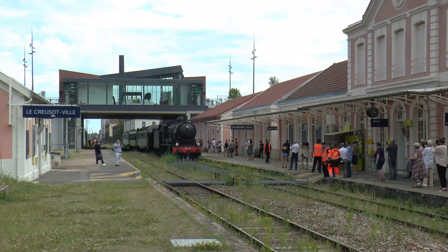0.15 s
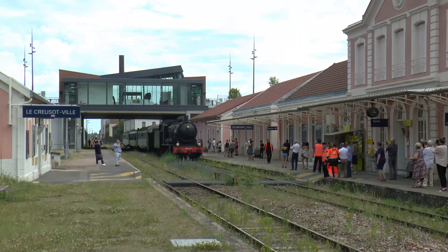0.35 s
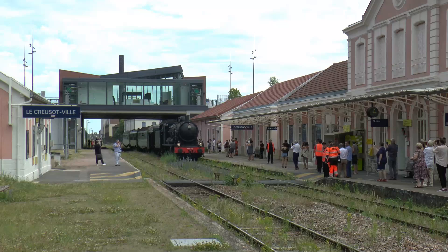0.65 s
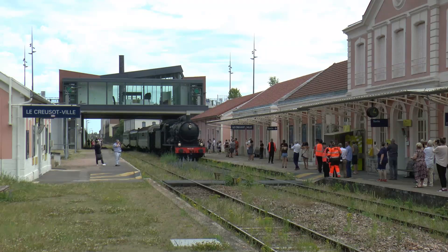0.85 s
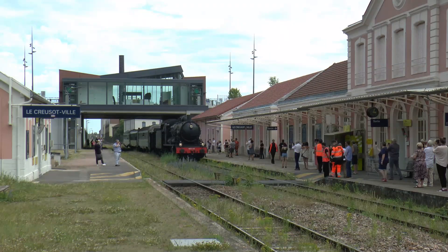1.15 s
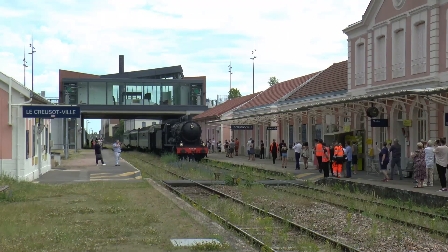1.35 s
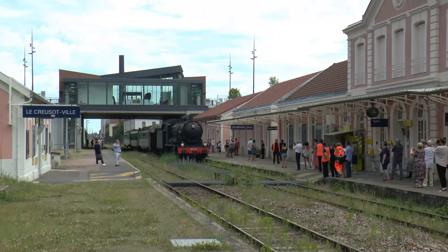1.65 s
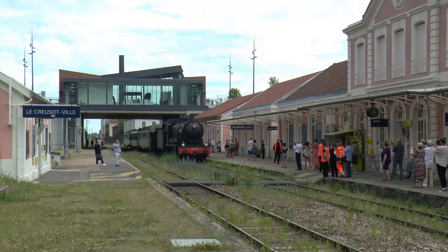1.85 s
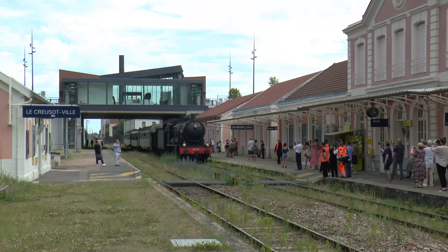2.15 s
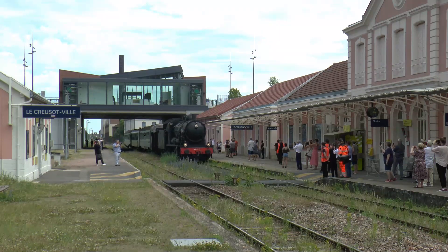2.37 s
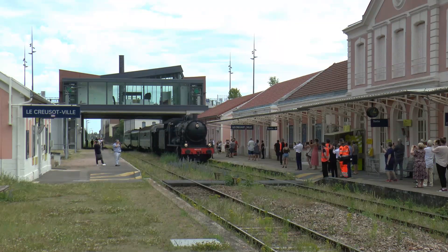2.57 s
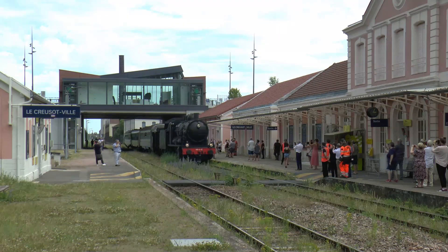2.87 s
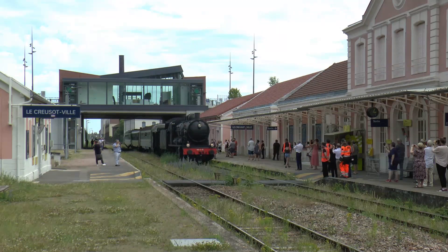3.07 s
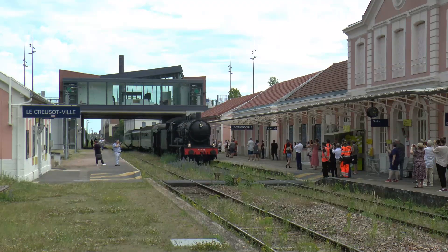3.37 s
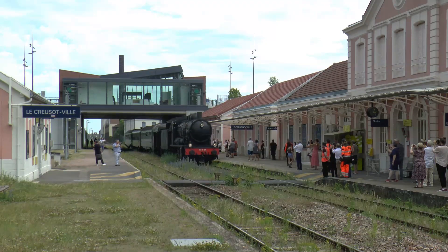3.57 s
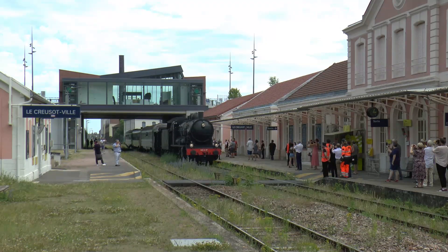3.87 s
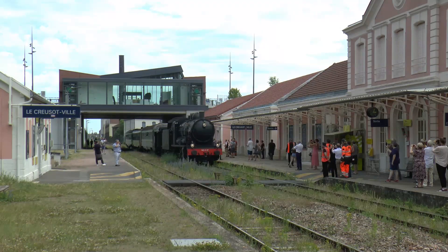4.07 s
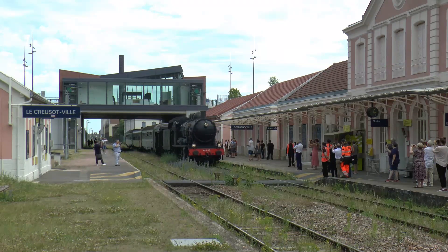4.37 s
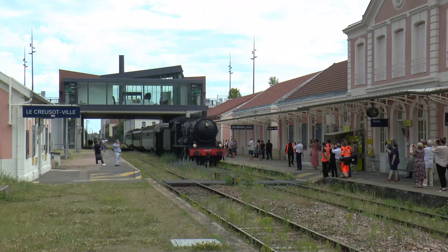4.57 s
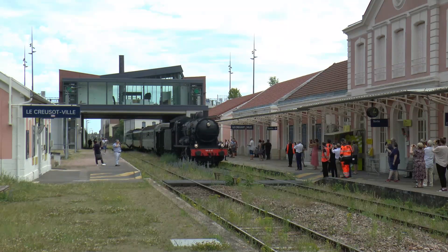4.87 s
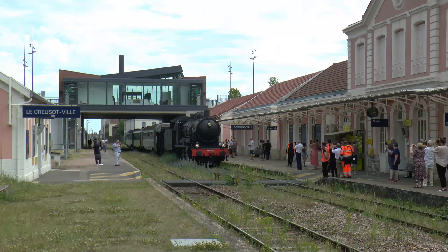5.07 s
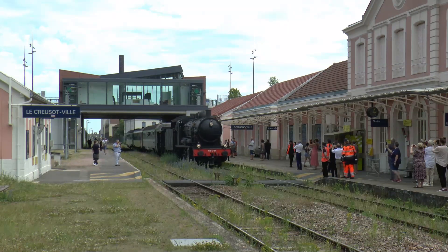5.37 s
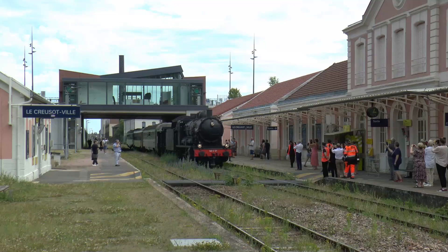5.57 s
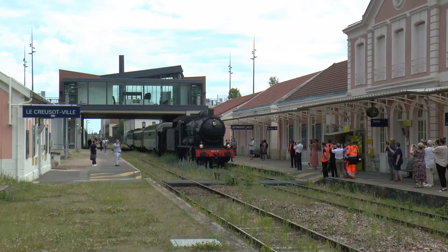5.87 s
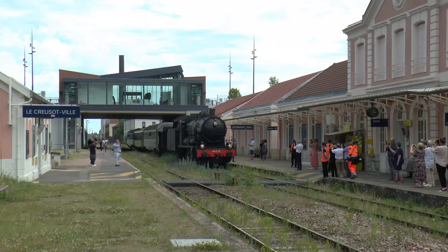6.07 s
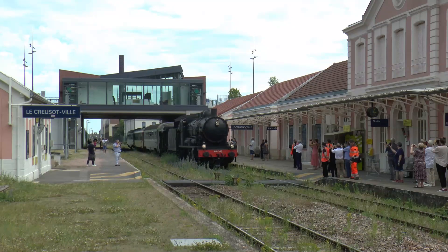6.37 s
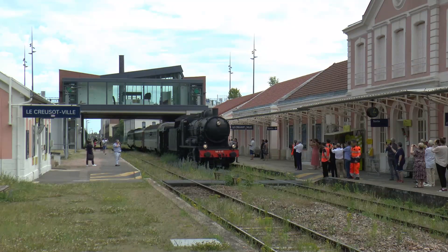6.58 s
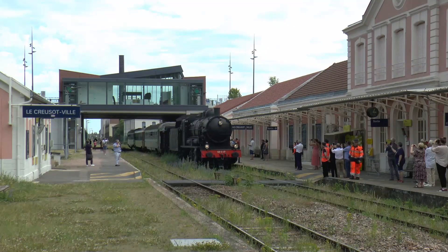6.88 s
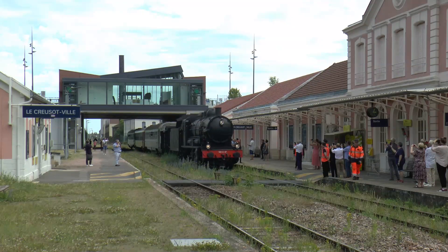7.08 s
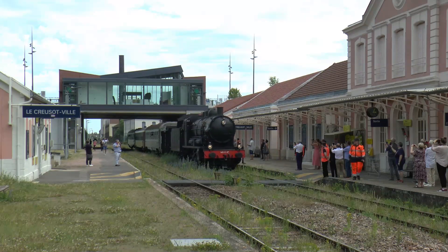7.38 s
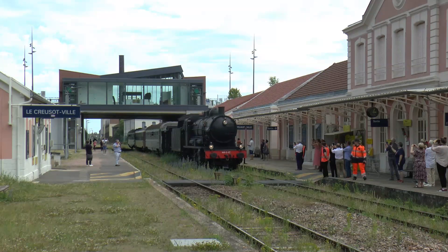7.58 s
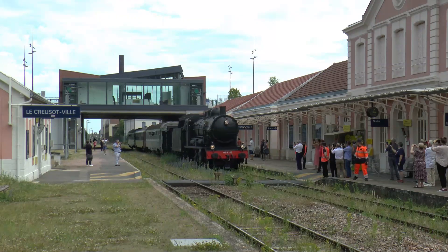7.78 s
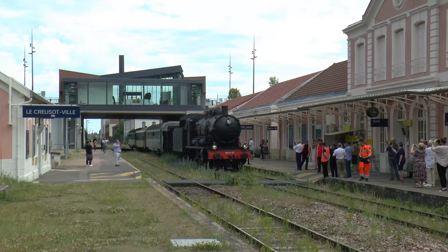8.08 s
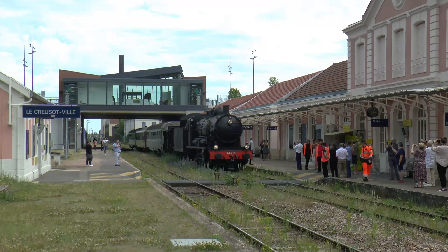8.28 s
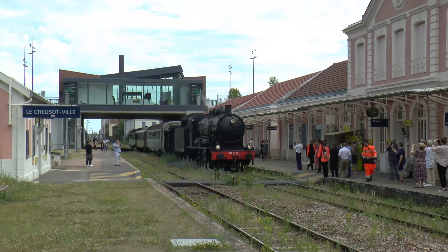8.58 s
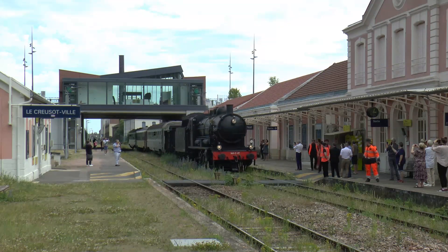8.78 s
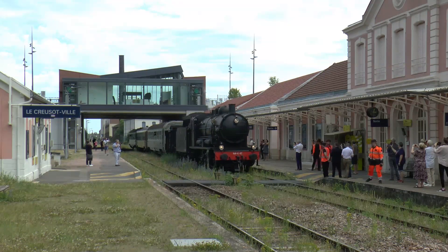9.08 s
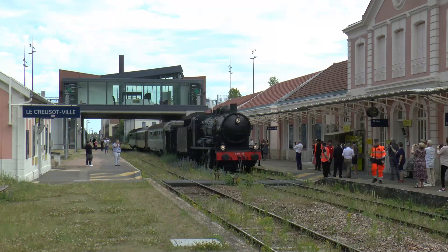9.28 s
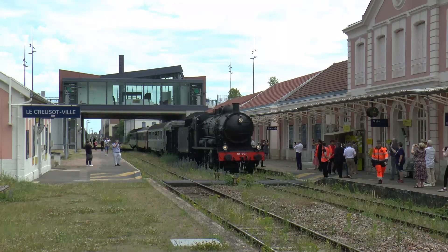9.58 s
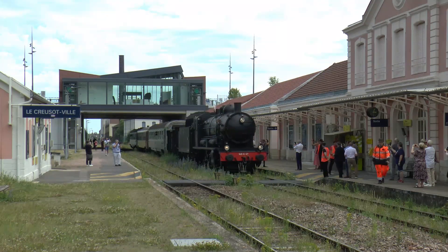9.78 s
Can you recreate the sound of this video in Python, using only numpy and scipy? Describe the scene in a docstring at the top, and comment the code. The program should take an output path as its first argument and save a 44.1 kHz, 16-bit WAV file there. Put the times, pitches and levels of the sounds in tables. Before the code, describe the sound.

A steam locomotive rolls slowly into a station, heard in stereo from some way off. Steam hisses throughout and grows louder over a low rumble of wheels and fire, with faint paired thumps from the air pump. A short, high whistle toot echoes off the buildings. Later comes a nearer, long, hoarse blast that climbs in steps, broken by brief rasps.

```python
"""A railway station, heard through a stereo microphone as a steam engine rolls slowly in, some way off.
Wheels and fire rumble, steam hisses all along, the air pump thumps in pairs, a faint tone sings at times.
A steam jet drives the whistle's bell: a short toot, later a nearer, long blast that rises as the valve
opens by steps, hoarse and with brief rasping bursts. Walls and roofs along the platforms send it back."""
import sys
import numpy as np
from scipy import signal
from scipy.fft import rfft, irfft, next_fast_len
from scipy.io import wavfile
from scipy.ndimage import uniform_filter1d, map_coordinates

SR = 44100
rng = np.random.default_rng(int(sys.argv[2]) if len(sys.argv) > 2 else 0)


def log_audio(samples):
    """Write samples as a 16-bit WAV file to the path given in sys.argv[1]."""
    # one column per channel
    frames = np.atleast_2d(samples).T
    # limit to full scale, then quantise
    limited = np.clip(frames, -1, 1)
    pcm = np.round(limited * 32767).astype(np.int16)
    wavfile.write(sys.argv[1], SR, pcm)


N = 438354

# the whistle valve during the short toot: (time [s], pitch [Hz], level of the fundamental [dB])
TOOT_VALVE = [(2.072, 1040, -42), (2.088, 1130, -22), (2.11, 1228, -19), (2.135, 1291, -13.5),
              (2.265, 1292, -12), (2.282, 1272, -20), (2.302, 1170, -20.5), (2.335, 1085, -26.5)]


def amp(db):
    """Decibels to gain."""
    return 10 ** (np.asarray(db) / 20)


def unit(x):
    """x at rms 1."""
    return x / np.sqrt(np.mean(x ** 2) + 1e-20)


def along(points, hz):
    """(frequency, value) points read at hz on a log axis."""
    f, values = np.transpose(points)
    return np.interp(np.log(hz + 1), np.log(f + 1), values)


def curves(rows):
    """One value per sample for each column after the time."""
    times, *columns = np.transpose(rows)
    return [np.interp(np.arange(N) / SR, times, column) for column in columns]


def wobble(rate, count=N):
    """A smooth random curve with `rate` knots a second."""
    fine = np.arange(0, count * rate / SR + 1, 1 / 16)
    smooth = map_coordinates(rng.standard_normal(int(count * rate / SR) + 4), [fine])
    return np.interp(np.arange(count) * rate / SR, fine, smooth)


def bumps(times, heights, widths):
    """The sum of bell-shaped bumps in time, one per event."""
    t = np.arange(0, N / SR + .001, .001)
    total = heights @ np.exp(-((t - times[:, None]) / np.reshape(widths, (-1, 1))) ** 2)
    return np.interp(np.arange(N) / SR, t, total)


def filtered(x, response):
    """x through a complex response of frequency."""
    size = next_fast_len(N + SR // 5, real=True)
    return irfft(rfft(x, size) * response(np.fft.rfftfreq(size, 1 / SR)), size)[..., :N]


def resonance(f, hz, width):
    """One causal resonance of peak gain 1."""
    return 1j * f * width / (hz * hz - f * f + 1j * f * width)


def noise(spectrum):
    """Mono noise of rms 1."""
    return unit(filtered(rng.standard_normal(N), lambda hz: amp(along(spectrum, hz))))


def rush(spectrum, patchy_db):
    """Stereo noise of rms 1 with patches of random gain in time and frequency."""
    # how alike left and right sound, centred in the mids, wider in lows and highs:
    # (frequency [Hz], correlation [0-1])
    likeness = [(30, 0.93), (80, 0.94), (250, .99), (1000, .999), (2500, 1), (5000, 0.97), (9000, 0.84),
                (14000, .78)]
    cells = signal.stft(rng.standard_normal((2, N)), nperseg=512)[2]
    patches = uniform_filter1d(rng.standard_normal(cells.shape[1:]), size=6, axis=0)
    patches = uniform_filter1d(patches, size=14, axis=1)
    pair = signal.istft(cells * amp(patchy_db * unit(patches)), nperseg=512)[1][:, :N]
    angle = lambda hz: np.arccos(np.clip(along(likeness, hz), -1, 1)) / 2
    mid, side = filtered(pair, lambda f: amp(along(spectrum, f)) * [np.cos(angle(f)), np.sin(angle(f))])
    return unit(np.array([mid + side, mid - side]))


def drone():
    """A faint, narrow band of noise hums low in the background."""
    hz, width_hz, db = 197, 13.7, -71
    return amp(db) * unit(filtered(rng.standard_normal(N), lambda f: resonance(f, hz, width_hz) ** 2))


def rolling():
    """Wheels and fire rumble some way off."""
    # the rumble's course: (time [s], level [dB])
    course = [(0, -62), (2.7, -59), (4.8, -61), (7.3, -58.5), (9.3, -56.5), (9.94, -57.5)]
    # its spectrum: (frequency [Hz], relative density [dB])
    rumble = [(12, -47), (20, -8), (80, -5), (113, -6.5), (188, -5.5), (368, -7.5), (413, -3.5),
              (511, -5.5), (564, -2.5), (602, -18.5), (1000, 0), (1300, -31), (2200, -120)]
    return amp(curves(course)[0] + 0.3 * wobble(2.34)) * rush(rumble, patchy_db=1.5)


def faint_tones():
    """Tones swell and fade in the hiss, most of them falling slightly."""
    # (start [s], length [s], first pitch [Hz], last pitch [Hz], level [dB])
    tones = [(.46, 0.41, 1242, 1200, -57), (1.1, 0.42, 1197, 1182, -56), (3.13, 0.25, 559, 580, -58),
             (4.17, 0.23, 1213, 1198, -56.5), (4.74, 0.61, 1233, 1178, -53.5),
             (6.68, 0.52, 1205, 1180, -54)]
    out = np.zeros(N)
    waver_hz, flutter_db = 6 * wobble(40), 2 * wobble(25)
    for start, length, first_hz, last_hz, db in tones:
        i = round(start * SR) + np.arange(round(length * SR))
        progress = (i - i[0]) / len(i)
        phase = 2 * np.pi * np.cumsum(first_hz + (last_hz - first_hz) * progress + waver_hz[i]) / SR
        swell = np.sin(np.pi * progress ** 0.73) ** .5
        out[i] += amp(db + flutter_db[i]) * swell * np.sin(phase)
    return out


def air_pump():
    """Each stroke is a puff of noise in the casing; bright strokes reach its upper resonances."""
    # pump strokes: (time [s], base level [dB], length [s], brightness [0-1])
    strokes = [(0.146, -59, 0.28, 0.3), (.57, -60.5, 0.22, 0.9), (3.9, -57, 0.24, 0.2),
               (4.26, -57, 0.27, 1), (5.758, -57, 0.22, 0), (6.12, -53.5, 0.19, 0.6), (7.09, -60, 0.12, 1),
               (7.446, -59, 0.46, 0.2)]
    # casing resonances: (frequency [Hz], width [Hz], gain before the stroke's tilt [dB])
    casing = [(368, 28, -5.5), (454, 40, 4), (732, 50, 15), (920, 290, 23), (2000, 500, -17)]
    out = np.zeros(N)
    modes = lambda f: np.array([resonance(f, hz, width) for hz, width, _ in casing])
    bands = [unit(band) for band in filtered(rng.standard_normal(N), modes)]
    for start, db, length, bright in strokes:
        i = round(start * SR) + np.arange(SR // 2)
        progress = (i - i[0]) / SR / length
        puff = (1 - np.exp(-progress / 0.066)) * np.exp(-2 * progress ** 2)
        db_per_octave = -3.1 * (6 - bright)
        for band, (hz, _, mode_db) in zip(bands, casing):
            out[i] += amp(db + mode_db + db_per_octave * np.log2(hz / casing[0][0])) * puff * band[i]
    return out


def leaking_steam():
    """Steam escapes as a broad hiss that rings in the pipes, with a thinner fizz above it."""
    # the leak's course: (time [s], hiss base level [dB], fizz base level [dB])
    leak = [(0, -53, -56), (1.4, -52, -50.5), (3.2, -50.5, -47), (4.55, -49, -49), (6.15, -48, -43),
            (7.3, -48.5, -45), (7.85, -45.5, -40.5), (8.7, -43.5, -40), (9.3, -41, -41.5), (9.5, -45, -45),
            (9.94, -40, -39)]
    # spectra of the two: (frequency [Hz], relative density [dB])
    hiss_spectrum = [(350, -33), (600, -8.5), (729, -8.5), (1110, -3.5), (1190, -5.5), (1370, -6),
                     (1640, -6), (2130, -4.5), (2330, -1.5), (3250, -1), (3750, 1.5), (4700, -1),
                     (8000, -5.5), (10400, -22.5), (17600, -120)]
    fizz_spectrum = [(3240, -20), (5500, -3), (9350, -4.5), (12400, -16), (14100, -21), (15200, -31)]
    # pipe resonances: (frequency [Hz], width [Hz], relative gain [dB])
    pipes = [(2135, 29, 9), (4666, 470, 0), (1212, 60, 6), (6600, 240, -6)]
    hiss_db, fizz_db = curves(leak)
    flow_db = .5 * wobble(6)
    hiss = amp(hiss_db + 5.5 + flow_db) * rush(hiss_spectrum, patchy_db=0.96)
    fizz = amp(fizz_db + 1.5 + flow_db + 0.22 * wobble(25)) * rush(fizz_spectrum, patchy_db=2.0)
    ringing = lambda f: 1 + sum(amp(db) * resonance(f, hz, width) / 2 for hz, width, db in pipes)
    return filtered(hiss, ringing) + fizz


def station_echoes(x, tail_db):
    """Single walls answer as duller copies; the whole yard adds a long tail."""
    # walls: (delay at the toot [s], its growth [s/s], gain [dB], left minus right [dB])
    walls = [(.028, 0.00088, -10.5, -5), (.05, .002, -1.5, 1.5), (0.103, .003, -2, 2), (.25, .012, -7, 4),
             (.29, .012, -1.5, 1), (.4, .008, -9, 3.5), (0.582, .004, -16.5, -4.5)]
    # the yard's reverberation: (frequency [Hz], time to fall 60 dB [s])
    yard_decay = [(500, 1.9), (1300, 2.1), (2600, 1.2), (5000, .45), (12000, .3)]
    hz, age, cells = signal.stft(rng.standard_normal((2, 2 * SR)), SR, nperseg=256)
    decay = amp(-60 * age / along(yard_decay, hz)[:, None])
    mid, side = signal.istft(cells * decay, SR, nperseg=256)[1]
    tail = mid + 0.08 * np.array([side, -side])
    tail /= np.linalg.norm(tail[0])
    cutoff_hz = 3600
    dull = filtered(x, lambda f: 1 / (1 + 1j * f / cutoff_hz * np.sqrt(2) - (f / cutoff_hz) ** 2) ** 2)
    out = amp(tail_db) * signal.fftconvolve(dull[None], tail, axes=1)[:, :N]
    t = np.arange(N) / SR
    for delay, growth, db, pan_db in walls:
        # walls behind the engine fall back, so their echoes sound flatter
        echo = np.interp(t - delay - growth * (t - TOOT_VALVE[0][0]), t, dull)
        out += amp(db + np.array([[pan_db], [-pan_db]]) / 2) * echo
    return out


def whistle_controls(valve, mix):
    """Overtones come in as the pitch nears its top and die as it sags; dips and bursts ride on top."""
    # brief dips of the fundamental: (time [s], depth [dB; negative lifts it], half width [s])
    dips = [(2.11, 7, 0.0041), (2.187, 14, 0.036), (7.721, 9.5, 0.014), (7.852, 18, 0.043),
            (7.99, 22, 0.04), (8.085, 13, 0.024), (8.167, 14, 0.015), (8.23, 9, 0.0066), (8.368, 9, 0.018),
            (8.424, 7, 0.0081), (8.517, 28, 0.024), (8.593, 23, 0.017), (8.657, 15, 0.013),
            (8.721, 14, 0.011), (8.815, 5, 0.013), (8.927, 8.5, 0.022), (9.036, 11, 0.01),
            (9.075, 7.5, 0.039), (9.169, 15.5, 0.012), (9.208, 10, 0.013), (9.278, 9.5, 0.0045),
            (9.328, 10.5, 0.021), (9.39, 11.5, 0.031), (9.441, 8, 0.0079), (9.61, -2.5, 0.075),
            (9.735, 1.5, .02)]
    # brief rasping bursts: (time [s], rasp [dB], steam jet [dB])
    bursts = [(8.21, -46.5, -67), (8.46, -52, -70), (8.69, -48, -56), (8.79, -47.5, -59), (8.89, -62, -50),
              (9.02, -67, -71), (9.13, -44, -44), (9.239, -34.5, -41), (9.3, -39.5, -73),
              (9.448, -37, -35.5), (9.7, -43, -39.5), (9.77, -50, -38.5)]
    shut_share, sag_share = .14, .1  # pitch drops that cost the shut loss and the sag loss
    sag_losses_db = (18, 26, 0, -4)  # closing valve: octave, upper partials, rasp, jet
    pitch, level_db = curves(valve)
    shut = ((1 - pitch / pitch.max()) / shut_share) ** 2.7
    sag = np.minimum(((1 - pitch / np.maximum.accumulate(pitch)) / sag_share) ** 2, 1)
    octave_db, upper_db, rasp_db, jet_db = [level_db + db - shut_db * shut - sag_db * sag
                                            for (db, shut_db), sag_db in zip(mix, sag_losses_db)]
    fundamental_db = level_db - bumps(*np.transpose(dips))
    times, *bursts_db = np.transpose(bursts)
    rasp_burst, jet_burst = [bumps(times, amp(db), widths=0.026) for db in bursts_db]
    rasp_db = 20 * np.log10(amp(rasp_db) + rasp_burst)
    surge_db = 20 * np.log10(1 + jet_burst / amp(jet_db))
    shrill_db = 0.44 * np.minimum(surge_db, 14)  # a surge of the jet lifts the upper partials
    return pitch, fundamental_db, octave_db, upper_db + shrill_db, rasp_db, jet_db + surge_db


def whistle(valve, mix, unsteady, flutter_db, spread):
    """A steam jet drives the bell: partials on an unsteady pitch, in hoarse noise. Gives mid, side."""
    # the bell's upper partials: (multiple of the pitch, relative level [dB])
    upper_partials = [(3, -3), (4, 3), (5, -1.5), (6, -12)]
    # steam at the lip, and a rasp around the fundamental: (frequency [Hz], relative density [dB])
    jet_spectrum = [(1000, -57), (1700, -6), (2600, 3.5), (4000, -1), (6600, -4), (9000, -6.5),
                    (11000, -16), (13500, -34), (15400, -73)]
    rasp_spectrum = [(120, -31), (300, -17), (600, -11.5), (900, 4), (1500, 2.5), (1900, -21.5),
                     (3000, -55)]
    start, end = valve[0][0], valve[-1][0]
    i = np.arange(round(start * SR), min(N, round(end * SR) + SR // 50))
    controls = [curve[i] for curve in whistle_controls(valve, mix)]
    pitch, fundamental_db, octave_db, upper_db, rasp_db, jet_db = controls
    drift = lambda rate: wobble(rate, count=len(i))
    gate = np.clip((i / SR - start) / 0.011, 0, 1) * np.clip((end + 0.011 - i / SR) / 0.029, 0, 1)
    phase = 2 * np.pi * np.cumsum(pitch * (1 + unsteady * drift(60))) / SR
    partials = [(1, fundamental_db), (2, octave_db)] + [(k, upper_db + db) for k, db in upper_partials]
    # eddies between engine and microphone make the partials flutter, fade and wander sideways
    tone = np.zeros(len(i))
    for k, db in partials:
        gain = amp(db + flutter_db * k ** 0.5 * drift(45.11))
        fading = 1 + 0.27 * (k > 1) * drift(70)
        tone += gain * fading * np.sin(k * phase)
    side = sum(amp(db) * spread * k ** 3.2 * drift(7.2) * np.cos(k * phase) for k, db in partials[:3])
    # a hoarse band of noise around the fundamental, with brief rasping bursts
    skirt = (amp(fundamental_db - 21) + amp(rasp_db + 0.5)) * drift(220) * np.sin(phase)
    rasp = amp(rasp_db + 4.5 + 1.9 * drift(29.9)) * noise(rasp_spectrum)[i]
    jet = amp(jet_db + 4) * noise(jet_spectrum)[i]
    out = np.zeros((2, N))
    out[:, i] = gate * [np.sqrt(2) * (tone + skirt) + rasp + jet, side]
    return out


def scene():
    """Two whistles over the engine's noises; the blast is nearer and stands further above its echoes."""
    # the valve opening by steps: (time [s], pitch [Hz], level of the fundamental [dB])
    blast_valve = [(7.6, 1006, -53.5), (7.781, 1083, -21), (7.999, 1096, -21.5), (8.141, 1110, -18.5),
                   (8.6, 1110, -18), (8.76, 1113, -12), (8.861, 1132, -11.5), (9.001, 1126, -13.5),
                   (9.191, 1147, -12.5), (9.261, 1193, -12), (9.349, 1246, -8), (9.48, 1250, -12),
                   (9.68, 1248, -17), (9.8, 1250, -12.5), (9.94, 1245, -13)]
    # rows for octave, upper partials, rasp, jet: (offset at full valve [dB], shut loss [dB])
    toot_mix = [(-16, 16), (-24, 20), (-29, -12), (-24, -2)]
    blast_mix = [(-14, 19.5), (-31, 13), (-40.5, -15), (-33.5, -3)]
    toot = whistle(TOOT_VALVE, toot_mix, unsteady=0.0021, flutter_db=1.5, spread=0.013)
    blast = whistle(blast_valve, blast_mix, unsteady=0.0038, flutter_db=1.43, spread=0.032)
    echoes = station_echoes(amp(-6) * toot[0] + amp(-17) * blast[0], tail_db=-2.5)
    mid, side = toot + blast
    direct = np.array([mid + side, mid - side]) * amp([[.4], [-.4]])  # just left of centre
    return direct + echoes + leaking_steam() + rolling() + drone() + air_pump() + faint_tones()


def record(dry):
    """The microphone's left port is a little louder; nothing passes above the band limit."""
    # balance of the ports: (frequency [Hz], left minus right [dB])
    balance = [(40, 1.3), (150, 1.2), (500, .2), (4000, .3), (14000, .3)]
    top_hz = 15400
    return filtered(dry, lambda hz: amp(along(balance, hz) / 2 * np.array([[1], [-1]])) * (hz < top_hz))


dry = scene()
out = record(dry)
log_audio(out)
```